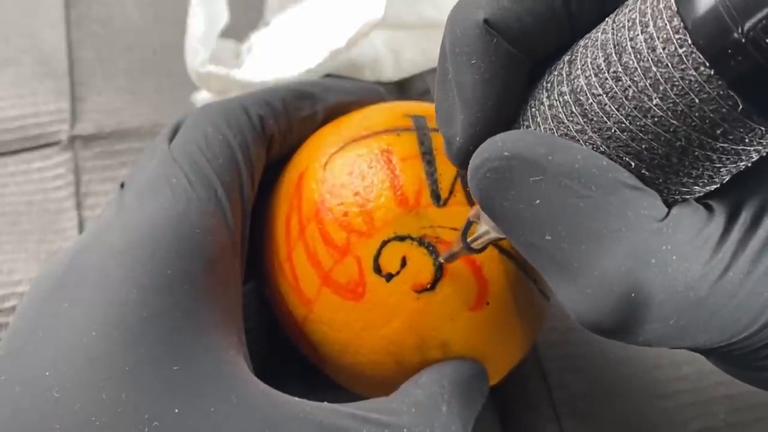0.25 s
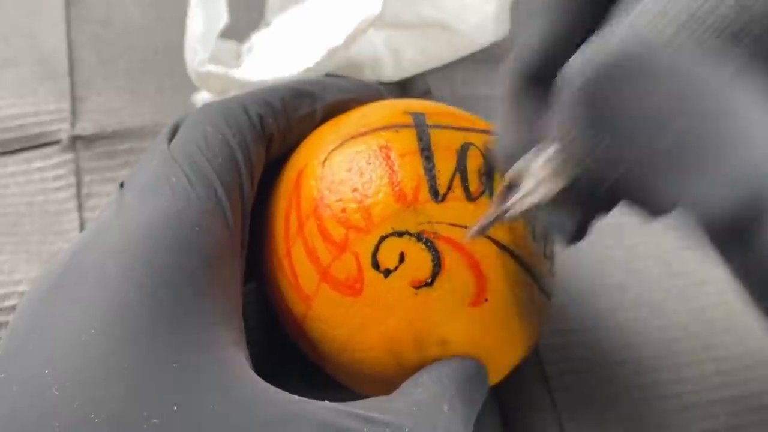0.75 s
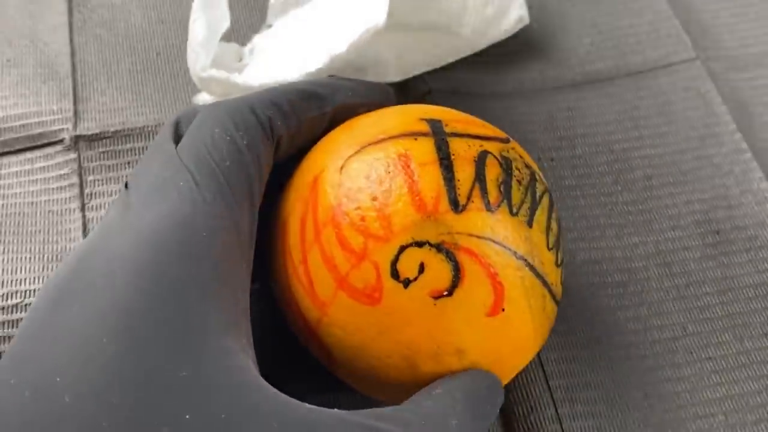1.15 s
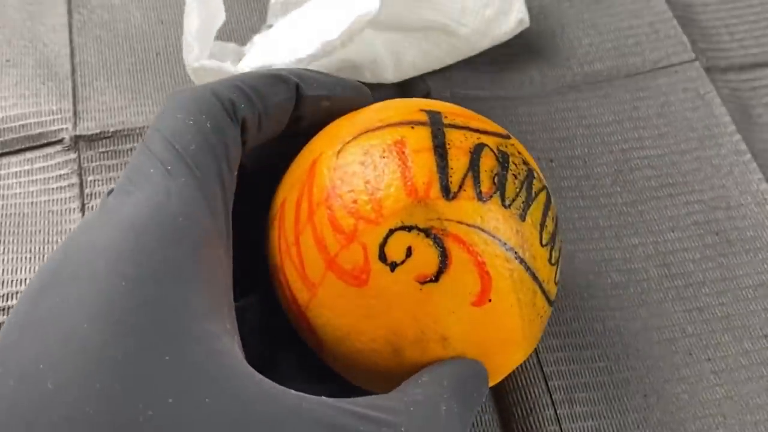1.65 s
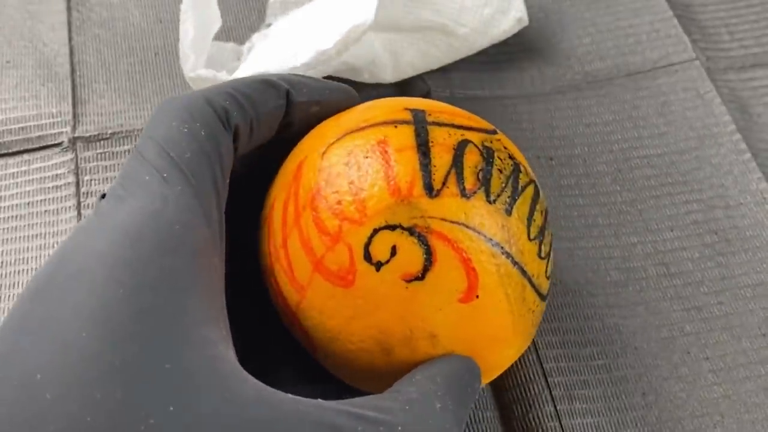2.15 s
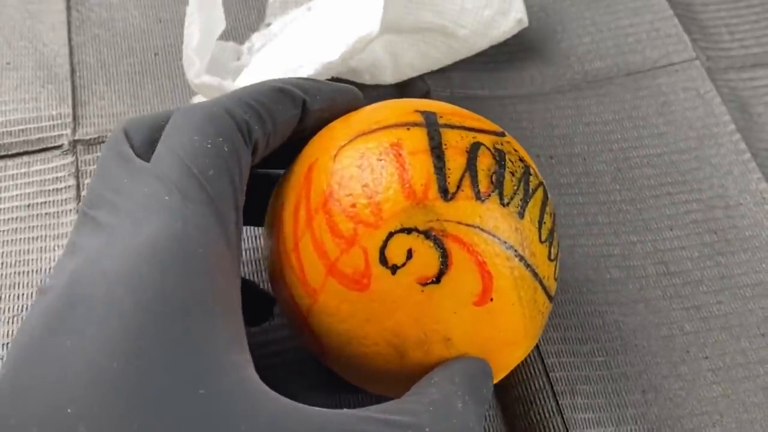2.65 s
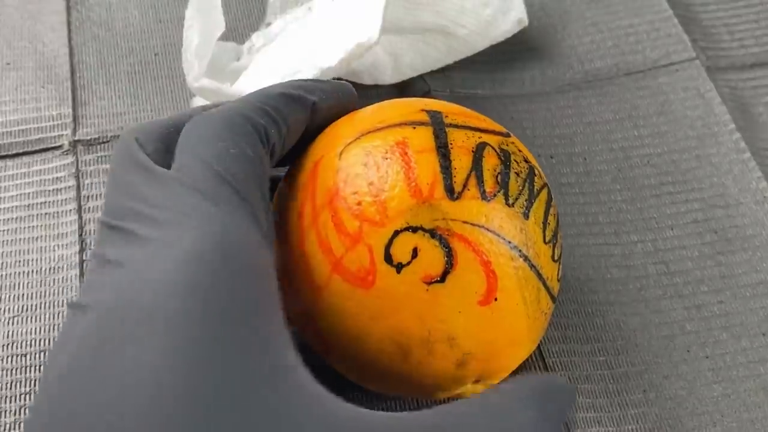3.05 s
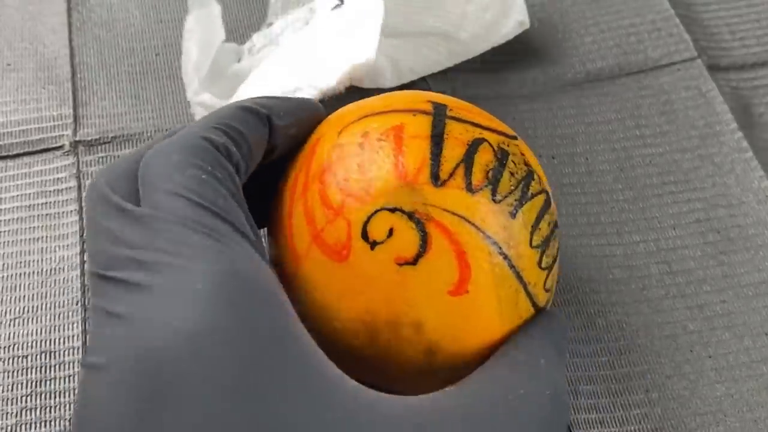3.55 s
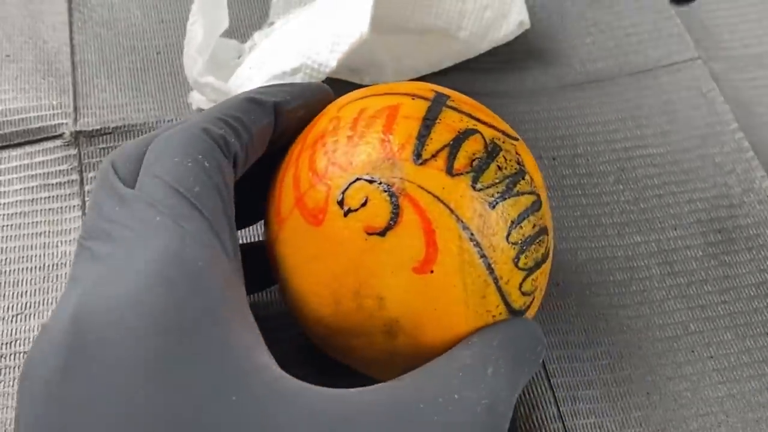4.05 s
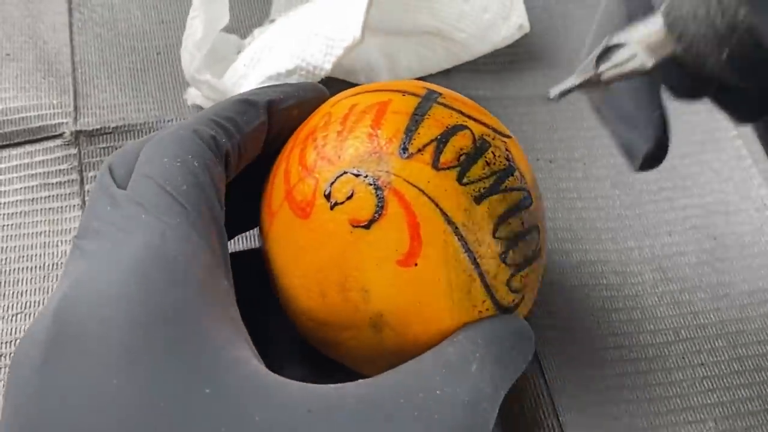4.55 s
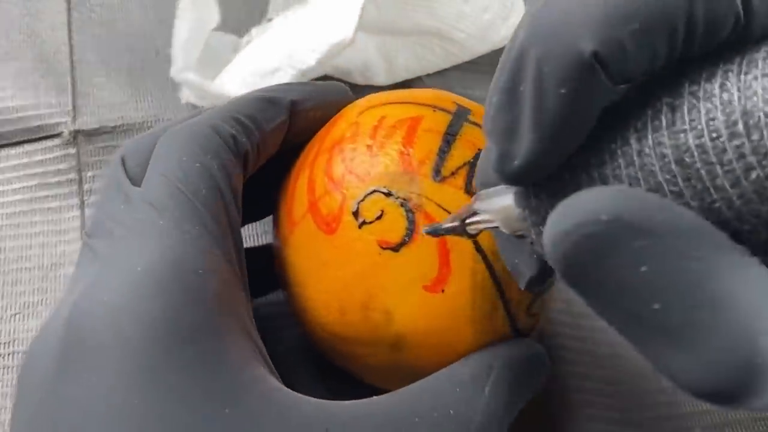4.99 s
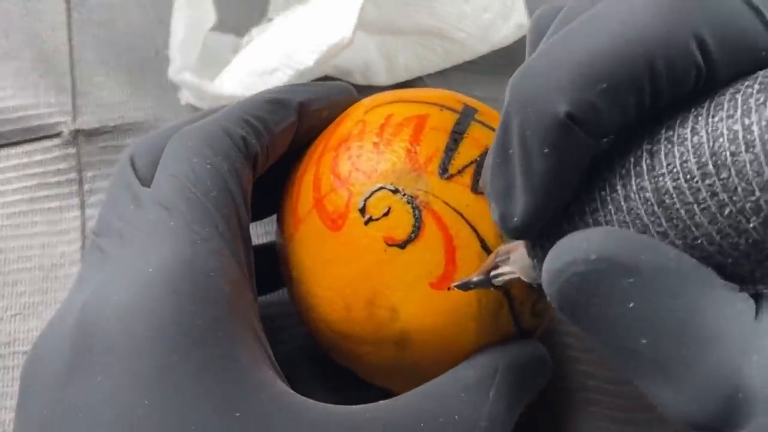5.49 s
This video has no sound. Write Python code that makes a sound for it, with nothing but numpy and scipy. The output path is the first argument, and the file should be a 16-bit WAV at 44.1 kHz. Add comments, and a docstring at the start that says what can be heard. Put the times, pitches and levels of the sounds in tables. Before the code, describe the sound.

Close, steady whirr and rapid ticking of a small needle motor, with a brief deep bump and soft rubber glove rustles in a quiet room.

```python
"""A rotary tattoo pen ticks and whirrs at a steady speed close by, while the orange it works on hums.
Its drive knocks at three points of each turn; the motor, housing and bearing add whirr, whine and rasp.
The pen is lifted off and held aside, where its bearing rasps louder, and then comes back turned to the left.
A low handling rumble with thumps passes over the microphone; gloves rustle and tap in a quiet room.
Ticks are short bursts, the whirr and rubs are shaped noise, and the whine and hums are sine waves."""
import sys
import numpy as np
from scipy import signal
from scipy.fft import rfft, irfft, next_fast_len
from scipy.io import wavfile
from scipy.ndimage import map_coordinates

SR = 44100
rng = np.random.default_rng(int(sys.argv[2]) if len(sys.argv) > 2 else 0)


def master(y):
    """Save y as 16-bit WAV."""
    cut = np.clip(np.atleast_2d(y).T, -1, 1)
    pcm = np.round(cut * 32767)  # scale
    wavfile.write(sys.argv[1], SR, pcm.astype(np.int16))


N = 252428

TURN_HZ = 80.4  # turns of the motor a second
CAGE_CYCLE_S = 0.286  # one cycle of the cage that holds the bearing's balls
REGRIP_S = 0.36  # time the hand takes to change its hold

# When the pen is held aside: start in seconds, end in seconds.
ASIDE = (1.41, 3.43)
# When the pen is back and turned to the left: start in seconds, end in seconds.
TURNED = (4.66, 6)
# When the arm reaches back in: start in seconds, end in seconds.
REACH = (4.2, 4.58)


def pen(turns, left_db=2.0, aside_left_db=-1.8, turned_left_db=3.5):
    """Motor whirr, whine, bearing and drive; the left-right balance shifts as the hand turns the pen."""
    # Whirr of the housing. Each row: frequency in Hz, relative level in dB per Hz.
    housing_shape = [(200, -8.5), (450, -14), (660, -20), (810, -5.5), (1000, -6), (1100, -7.5),
                     (1260, -1.5), (1550, -0.5), (1800, 2.5), (2150, -1), (2600, -3.5), (4000, -43)]
    # Dull lower part of the whirr. Each row: frequency in Hz, relative level in dB per Hz.
    low_whirr_shape = [(200, -9), (400, -3), (700, -7), (1100, -36), (3000, -70)]
    # Whirr of brushes and housing. Each row: frequency in Hz, relative level in dB per Hz.
    brush_shape = [(700, -45), (1500, -20), (2200, -2), (2600, -1), (3000, -0.5), (3400, -7), (4200, -2.5),
                   (5500, -15), (9000, -64)]
    # Hiss of the brushes. Each row: frequency in Hz, relative level in dB per Hz.
    hiss_shape = [(700, -25), (2500, -39), (4200, 0.5), (5500, 6), (6500, 8), (7600, 6.5), (8900, 8),
                  (10400, 6.5), (11500, 7), (13000, 4), (15000, 2), (15800, -9)]
    tonal = .65  # share of the whirr's power that is tones, the rest is noise
    housing = coloured(rasp(turns, tonal, side_db=-3.0), housing_shape)
    housing *= pose(-55.5, follows=0.8, aside_db=0.5, turned_db=-1.5)
    # weaker while the pen is held aside
    low_whirr = coloured(rasp(turns, tonal, side_db=1.0), low_whirr_shape)
    low_whirr *= pose(-67.0, follows=2.4, aside_db=-7.0, turned_db=-4.5)
    brushes = coloured(rasp(turns, tonal, side_db=-25), brush_shape)
    brushes *= pose(-58.0, follows=0.81, aside_db=-2.0, turned_db=1.0)
    hiss = coloured(spread(chatter(turns, repeat=0.14), side_db=0.5), hiss_shape)
    hiss *= pose(-55.5, follows=1.46, aside_db=-0.6, turned_db=-0.5)
    shake = amp(-62) * tones(turns, [(1, 0)], waver_db=3, skew=.05)  # the rotor's imbalance
    lean = pose(left_db, follows=0.19, aside_db=aside_left_db, turned_db=turned_left_db)
    sides = lean ** np.array([[.5], [-.5]])
    # each group of parts leans to the side by its own amount
    whirr = (flare(turns, tonal) + housing + bearing(turns) + low_whirr + brushes) * sides ** 0.77
    singing = (gears(turns) + whine(turns)) * sides ** 2.5
    crisp = (drive(turns) + hiss) * sides ** 0.22
    return hollowed(whirr + singing + crisp) + shake


def drive(turns, tremble_db=1.74):
    """The needle bar knocks at its stroke end, on the way back and at the top; the first two ring its tube."""
    # Stroke-end tick. Each row: frequency in Hz, relative level in dB per Hz.
    end_shape = [(500, -40), (1000, -2), (1600, -5.5), (2900, 3.5), (3400, -1.5), (4200, -8), (5300, -3),
                 (6200, -2.5), (7400, -0.5), (8200, -5.5), (8900, 5), (10400, -7), (11300, 1.5),
                 (12200, -3.5), (13000, -4), (15500, -6)]
    # Tick on the way back. Each row: frequency in Hz, relative level in dB per Hz.
    return_shape = [(500, -30), (1100, -40), (2600, -11), (4800, 11), (6800, -12), (9000, -11),
                    (10400, -11), (11200, 18), (12200, 13), (13000, 12), (15000, -6), (15800, -10)]
    # Tick at the top. Each row: frequency in Hz, relative level in dB per Hz.
    top_shape = [(500, -38), (1000, -16), (1600, 9.5), (2800, -11), (5600, 1.5), (6600, -16), (9000, -14),
                 (10400, -4.5), (11300, 9.5), (12200, 4.5), (13000, 1), (15500, -4)]
    # Base level shared by the return and top ticks. Each row: time in seconds, level in dB.
    treble_levels = [(0, -67), (.55, -69), (.75, -56), (1.47, -56.5), (1.65, -62), (2.6, -60), (2.9, -57.5),
                     (3.6, -57), (4.42, -55.5), (4.78, -66), (5.13, -52), (5.5, -64)]
    # Extra tube ring in some holds. Each row: start in seconds, end in seconds, added level in dB.
    tube_swells = [(-.2, .55, -68.5), (0.582, .85, -63.5), (1.382, 1.552, -67.5), (1.945, 2.8, -64),
                   (3.423, 3.6, -66), (4.253, 4.76, -64.5)]
    treble_db, = curves(treble_levels)
    ring = amp(-71.5)  # the tube's ring outside these swells
    for start, stop, db in tube_swells:
        ring = ring + amp(db) * held(start, stop, fade=0.22)
    end = ticks(turns, at=.17, decay=0.0013, spectrum=end_shape, side_db=-8.0, contact_db=-11.0)
    end *= pose(-54.5, follows=1.35, aside_db=-1.5, turned_db=0.0)
    first_ring = tube(turns, at=.22, side_db=-18, contact_db=7)
    second_ring = amp(-7.5) * tube(turns, at=.6, side_db=-23, contact_db=9)
    rung = ring * (first_ring + second_ring)
    back = ticks(turns, at=.57, decay=0.00094, spectrum=return_shape, side_db=0.5, contact_db=-7.5)
    back *= pose(-3.0, follows=-.1, aside_db=0.5, turned_db=-2.5)
    top = ticks(turns, at=0.97, decay=0.00087, spectrum=top_shape, side_db=-1, contact_db=-9)
    top *= pose(-0.34, follows=-0.18, aside_db=-3.0, turned_db=-9)
    load = amp(1.1 * wobble(14))  # the rattle waxes and wanes a little
    return end * amp(tremble_db * wobble(25.01)) + (rung + (back + top) * amp(treble_db)) * load


def ticks(turns, at, decay, spectrum, side_db, contact_db):
    """One sharp contact near the same point of each turn, with a rattle that dies in decay seconds."""
    play = .0055 * wobble(2 * TURN_HZ)  # in turns: loose parts meet a little early or late
    position = turns + play - at + 2
    lap, part = np.divmod(position, 1)
    size_db = .7 * rng.standard_normal(int(6 * TURN_HZ) + 9)  # one strength for each turn
    size = amp(size_db)[lap.astype(int)]
    contact = unit(np.diff(lap, prepend=lap[0])) * [[1], [0]]  # in the middle only
    rattle = unit(chatter(position, repeat=.6) * np.exp(-part / TURN_HZ / decay))
    return ringing(spread(rattle + amp(contact_db) * contact, side_db) * size, spectrum)


def tube(turns, at, side_db, contact_db):
    """One knock a turn with a ringing band near 4 kHz, which slides up and down over the seconds."""
    # Ringing band. Each row: frequency in Hz, relative level in dB per Hz.
    tube_shape = [(800, -54), (2500, -10.5), (3300, -8.5), (3700, 3), (4000, 6), (4350, 2), (4800, -6),
                  (5400, -13), (8000, -24.5)]
    # Where the band slides to. Each row: time in seconds, pitch in Hz.
    tube_pitch = [(0, 4230), (.7, 4230), (.9, 4050), (1.5, 4300), (1.95, 3920), (2.55, 4150), (2.95, 3750),
                  (3.45, 4330), (3.7, 4680), (4.25, 4350), (4.62, 3730), (5.7, 4000)]
    pitch_hz, = curves(tube_pitch)
    knocks = ticks(turns, at, decay=0.00053, spectrum=tube_shape, side_db=side_db, contact_db=contact_db)
    age = ((turns - at + .1) % 1 - .1) / TURN_HZ  # seconds since the knock
    shift = np.exp(2j * np.pi * (pitch_hz - 4000) * age)  # moves the ring away from its 4000 Hz centre
    return np.real(signal.hilbert(knocks, next_fast_len(N))[:, :N] * shift)


def bearing(turns):
    """A narrow rasp pulses with the shaft; held aside, the ball cage catches in a limping rhythm."""
    # Three catches in each cage cycle. Each row: seconds into the cycle, peak in dB, half length in seconds.
    catches = [(0, -52, 0.0086), (0.109, -55.5, 0.0063), (.16, -56.5, .016)]
    band = [(1200, -90), (1700, -80), (1810, 5), (1920, 8.5), (2010, 8.5), (2080, -34), (2600, -87)]
    first_s = 1.606  # a cage cycle starts here
    cage = 0
    for s, db, length in catches:
        cycles = (clock() - first_s - s) / CAGE_CYCLE_S
        from_catch = (cycles + .5) % 1 * CAGE_CYCLE_S - CAGE_CYCLE_S / 2  # seconds to the nearest catch
        cage = cage + amp(db) * np.exp(-(from_catch / length) ** 2)
    pulse = 1 + 0.37 * np.cos(2 * np.pi * (turns - .25))
    level = pose(-62.5, follows=0.27, aside_db=3.5, turned_db=-0.5) + cage * held(*ASIDE, REGRIP_S)
    return level * pulse * even(band, side_db=-30.0)


def gears(turns):
    """Motor tones at fixed multiples of the turn rate, each changing with the hold of the pen."""
    # Each row: multiple of the turn rate, level in dB before the nearness acts, change when held aside
    # in dB before a common cut, change when turned in dB.
    motor_orders = [(9, -79, -6, -8), (10, -76, 5, -4), (11, -79, 7, -7), (12, -77, 6, -2),
                    (15, -81, 7, -6), (16, -71.5, 5, -1), (17.25, -73, -4, -7), (18.52, -64.5, -6, -13),
                    (19.3, -65.5, -6, -11), (20.5, -73, -3, -4), (21.23, -76, 3, 3), (22.8, -71, 0, -5),
                    (24, -66.5, -1, -4), (27, -74, 0, 5), (32, -66.5, -5, 0), (36, -64.5, -7, -5),
                    (37, -77, -3, 2), (40, -80, -3, -1), (48, -76, -2, 0), (49, -76, -2, -4),
                    (51, -75.5, 0, -6), (54, -77, -2, -4), (56, -75, -3, -2)]
    out = 0
    for order, db, aside, turned in motor_orders:
        level = pose(db, follows=2.17, aside_db=aside - 3.5, turned_db=turned)  # 3.5 dB is the common cut
        out = out + level * tones(turns, [(order, 0)], waver_db=2.5, skew=0.57)
    return out


def whine(turns):
    """The motor sings on two high multiples of the turn rate, which stand out in some holds."""
    # Each row: multiple of the turn rate, relative level in dB.
    whine_orders = [(28, -2), (29, -15)]
    # Each row: start in seconds, end in seconds, added level in dB, rise and fall in seconds.
    whine_swells = [(0.755, 0.966, -58.5, 0.07), (1.44, 3.543, -57, 0.29), (4.16, 4.395, -58, 0.17),
                    (4.7, 6, -65.5, 0.2)]
    sing = amp(-70.5)  # level outside the swells
    for start, end, db, fade in whine_swells:
        sing = sing + amp(db) * held(start, end, fade)
    return sing * tones(turns, whine_orders, waver_db=0.8, skew=0.39)


def flare(turns, tonal):
    """The housing rings out as the pen leaves the fruit."""
    # Start in seconds, end in seconds.
    flare_span = (.77, 0.94)
    # Each row: frequency in Hz, relative level in dB per Hz.
    flare_shape = [(1100, -25), (1520, 8), (1680, -2), (1850, 5), (2200, 1), (2550, -14), (2900, -3),
                   (3500, -18), (4500, -10), (6000, -12), (8000, -30)]
    return amp(-55) * held(*flare_span, fade=0.068) * coloured(rasp(turns, tonal, side_db=-11), flare_shape)


def hollowed(x):
    """The whirr sounds hollow, with one band turned down, while the pen is tipped back in."""
    # Start in seconds, end in seconds.
    hollow_span = (4.35, 4.68)
    centre_hz, width_hz, band_db = 2440, 210, -8
    band = filtered(x, lambda hz: np.exp(-((hz - centre_hz) / width_hz) ** 2))
    return x - (1 - amp(band_db)) * held(*hollow_span, fade=.16) * band


def pose(db, follows, aside_db, turned_db):
    """Gain of one part of the pen: it follows the nearness and changes with the hold."""
    # How near the hand holds the pen. Each row: time in seconds, gain in dB where follows is 1.
    nearness = [(0, -0.5), (.36, .3), (.62, -0.8), (.77, -0.9), (.95, -1.5), (1.15, -3.5), (1.32, -2.7),
                (1.62, -2), (2.5, -2.5), (3.28, -3.5), (3.72, -3), (4.33, -1.35), (4.58, -1.3),
                (4.85, -0.5), (5.72, -0.5)]
    near_db, = curves(nearness)
    hold_db = aside_db * held(*ASIDE, REGRIP_S) + turned_db * held(*TURNED, REGRIP_S)
    return amp(db + follows * near_db + hold_db)


def bright_bursts():
    """Two very short bright bursts of noise, each starting sharply and fading at once."""
    # Each row: time in seconds, peak in dB.
    burst_list = [(0.721, -40), (2.279, -44)]
    t60_s = 0.013  # time to fall by 60 dB
    t = clock()
    level = sum(amp(db - 60 * np.abs(t - s) / t60_s) * (t >= s) for s, db in burst_list)
    return level * noise([(1500, -23), (4000, -2), (12000, 15), (15500, -8)], side_db=-10)


def orange(turns, stab=0.926, lag=0.254, overtone_db=-4):
    """Each stab pushes the peel in; the fruit answers later in higher overtones that outlast the pressure."""
    # Needle pressed on the orange. Each row: start in seconds, end in seconds, base level in dB.
    presses = [(0, 0.064, -40), (.215, .37, -41.5), (0.4, 0.42, -38.5)]
    # Overtones of the peel. Each row: multiple of the turn rate, relative level in dB.
    peel_orders = [(2, 2.5), (3, -6.5), (4, -3.5), (5, -13), (6, -16.5), (7, -19), (9, -22.5), (10, -30)]
    lift_off_s = 0.594  # the needle leaves the peel
    hum = np.max([amp(db) * swell(start, end, rise_db_per_s=214, fall_db_per_s=225)
                  for start, end, db in presses], axis=0)
    touch = np.max([amp(db) * swell(start, end, rise_db_per_s=136, fall_db_per_s=116)
                    for start, end, db in presses], axis=0)
    angle = 2 * np.pi * (turns - stab)
    buzz = 0
    for order, db in peel_orders:
        wave = np.cos(order * angle - lag * (order - 2) ** 2)
        buzz = buzz + amp(db + 2.0 * wobble(11.0)) * wave
    push = hum * np.sqrt(2) * np.cos(angle) + amp(overtone_db) * touch * unit(buzz)
    return -push * held(-1, lift_off_s, fade=0.08) * amp([[.5], [-.5]])


def handling(rumble_db=-34, body_db=-35.0, rub_db=-41, scrape_db=-49.0):
    """A lumpy rumble swells at the microphone, peaks, scrapes and flutters out; a soft bump follows later."""
    # Deep rumble. Each row: frequency in Hz, relative level in dB per Hz.
    rumble_shape = [(18, -62), (26, -17), (33, -20), (43, 0.5), (60, -2.5), (90, -9), (130, -25),
                    (220, -47), (800, -110)]
    # Fuller part of the rumble. Each row: frequency in Hz, relative level in dB per Hz.
    body_shape = [(30, -40), (70, -35), (140, 3.5), (260, 2), (350, -3), (450, -15), (700, -35),
                  (3000, -80)]
    # Rubbing above the rumble. Each row: frequency in Hz, relative level in dB per Hz.
    rub_shape = [(150, -29.5), (300, -6), (440, 0), (650, -6), (870, -8), (1100, -20.5), (2000, -47),
                 (6000, -80)]
    # Scrape after the peak. Each row: frequency in Hz, relative level in dB per Hz.
    scrape_shape = [(250, -20), (650, -0.5), (880, -9), (1120, 1), (1350, -9), (1600, -4), (2100, -4),
                    (3000, -16), (6000, -35)]
    # Soft thumps. Each row: time in seconds, peak in dB before the balance, pitch in Hz,
    # half length in seconds.
    thumps = [(1.651, -33, 54, .016), (1.726, -24, 66, 0.013), (1.917, -33, 49, 0.021),
              (1.994, -33, 49, 0.016), (2.074, -35, 54, 0.021), (4.384, -42.5, 127, 0.025)]
    start_s, peak_s, stop_s = 1.585, 1.723, 2.115
    lumps = amp(1.1 * wobble(90))  # the contact catches and slips
    rumble = amp(rumble_db) * swell(peak_s, peak_s, rise_db_per_s=20, fall_db_per_s=41)
    rumble = rumble * even(rumble_shape, side_db=-19)
    body = amp(body_db) * swell(peak_s, peak_s, rise_db_per_s=73, fall_db_per_s=59.5)
    body = body * even(body_shape, side_db=-14)
    rub = amp(rub_db) * swell(peak_s, peak_s, rise_db_per_s=98, fall_db_per_s=77)
    rub = rub * even(rub_shape, side_db=0.5)
    scrape = amp(scrape_db) * swell(1.76, 1.786, rise_db_per_s=600, fall_db_per_s=106)
    scrape = scrape * noise(scrape_shape, side_db=-1)
    out = (rumble + (body + rub + scrape) * lumps) * held(start_s, stop_s, fade=0.08)
    for s, db, hz, length in thumps:
        age = clock() - s
        out += amp(db) * np.exp(-(age / length) ** 2) * np.cos(2 * np.pi * hz * age)
    scuff = amp(-51.5) * swell(2.012, 2.032, rise_db_per_s=1200, fall_db_per_s=450)
    scuff = scuff * noise(tilted(rub_shape, -11), side_db=-9.0)
    return (out + scuff) * amp([[.4], [-.4]])


def gloves():
    """Rubber slides in soft swells and taps the fruit."""
    # Slides. Each row: time in seconds, peak in dB before the slipping, half length in seconds.
    rustles = [(0.66, -58, 0.071), (0.886, -61.5, 0.13), (1.298, -55, 0.086), (3.3, -67.5, .08),
               (3.46, -63.5, .035), (3.816, -61.5, 0.11), (4.22, -59.5, .2)]
    # Sliding rubber. Each row: frequency in Hz, relative level in dB per Hz.
    glove_shape = [(200, 2), (650, 7.5), (1100, 13.5), (1550, 13), (2700, 6), (3600, 3), (5500, 6),
                   (8000, 6), (15000, -24)]
    # Taps. Each row: time in seconds, peak in dB, time to fall by 60 dB in seconds,
    # brightness in dB per octave.
    tap_list = [(3.171, -51, 0.027, 3.5), (3.424, -43, 0.075, 1), (3.438, -51, 0.065, -1.5),
                (3.474, -50.5, 0.045, -2)]
    # A tap before its brightness. Each row: frequency in Hz, relative level in dB per Hz.
    tap_shape = [(200, -10), (450, -1), (700, 4), (1050, 9), (1500, 1), (2400, 0), (3150, 3.5), (4000, -8),
                 (9000, -11), (15000, -22)]
    t = clock()
    slide = sum(amp(db) * np.exp(-((t - s) / length) ** 2) for s, db, length in rustles)
    taps = 0
    for s, db, t60, bright in tap_list:
        decay = amp(db - 60 * np.abs(t - s) / t60) * (t >= s)
        taps = taps + decay * noise(tilted(tap_shape, bright), side_db=-2.5)
    slip = amp(1.8 * wobble(60))  # rubber sticks and slips
    return slide * slip * noise(glove_shape, side_db=-14) + taps


def low_noise(level_db=-61):
    """Soft low noise around 135 Hz that fades in at 4.2 s and stays."""
    # Each row: frequency in Hz, relative level in dB per Hz.
    low_noise_shape = [(60, -30), (100, -3), (135, 0), (175, -5), (240, -20), (500, -45), (2000, -90)]
    level = amp(level_db + 2 * wobble(6)) * held(REACH[0], TURNED[1], fade=.2)
    return level * noise(low_noise_shape, side_db=-12)


def room_tone(rumble_db=-53, reach_db=2.5):
    """Low rumble, a little stronger while the hand is near or reaching in, and one faint hum."""
    # Rumble of the room. Each row: frequency in Hz, relative level in dB per Hz.
    air_shape = [(22, -62), (38, -7), (55, 6), (80, -2), (120, -4), (170, -11.5), (260, -17.5), (380, -36),
                 (600, -37), (2000, -52), (15000, -81)]
    # Hum of steady pitch. Each row: frequency in Hz, level in dB around which it wavers.
    room_hum = [(282, -69.5)]
    level = pose(rumble_db, follows=0.31, aside_db=0.5, turned_db=1.2)
    level = level * amp(reach_db * held(*REACH, fade=0.39))
    hum = sum(np.sqrt(2) * amp(db + wobble(4.41)) * np.sin(2 * np.pi * hz * clock()) for hz, db in room_hum)
    return level * noise(air_shape, side_db=-12.0) * amp([[.4], [-.4]]) + hum


def walls(x):
    """The small room's answer, a tail of fading noise; treble dies first."""
    # Each row: frequency in Hz, time to fall by 60 dB in seconds.
    wall_t60 = [(200, 0.51), (2000, 0.16), (12000, 0.079)]
    hz, t, z = signal.stft(rng.standard_normal((2, SR // 3)), SR, nperseg=256)
    fading = z * amp(-60 * t / along(wall_t60, hz)[:, None])
    tail = signal.istft(fading, SR, nperseg=256)[1]
    return signal.fftconvolve(x, tail / np.linalg.norm(tail[0]), axes=1)[:, :N]


def tones(turns, orders, waver_db, skew):
    """Shaft tones that waver in level and reach left and right a little out of phase."""
    out = np.zeros((2, N))
    for order, db in orders:
        phase = 2 * np.pi * (order * turns + rng.random()) + skew * rng.standard_normal((2, 1))
        out += np.sqrt(2) * amp(db + waver_db * wobble(7)) * np.sin(phase)
    return out


def rasp(turns, tonal, side_db):
    """Shaft harmonics with scattered bearing tones between them, plus noise; tonal is the tones' share."""
    laps = round(CAGE_CYCLE_S * TURN_HZ)  # turns before the pattern repeats
    size = int(laps * SR / TURN_HZ)
    k = np.arange(size // 2 + 1)
    lines = np.where(k % laps == 0, .7, rng.random((2, len(k))) < .12)
    pattern = unit(irfft(lines * np.exp(2j * np.pi * rng.random(lines.shape)), size))
    partials = pattern[:, (turns / laps % 1 * size).astype(int)]
    return spread(np.sqrt(tonal) * partials + np.sqrt(1 - tonal) * rng.standard_normal((2, N)), side_db)


def chatter(turns, repeat):
    """Two noises, each with a share that comes back alike on every turn."""
    size = int(SR / TURN_HZ)
    pattern = rng.standard_normal((2, size))[:, (turns % 1 * size).astype(int)]
    share = np.clip(repeat, 0, 1)
    return np.sqrt(share) * pattern + np.sqrt(1 - share) * rng.standard_normal((2, N))


def ringing(x, spectrum):
    """x through a body that rings only after it is struck, with this (Hz, dB) spectrum, at rms 1."""
    size = 2048
    cepstrum = irfft(np.log(amp(along(spectrum, np.fft.rfftfreq(size, 1 / SR)))))
    # folding the cepstrum forward puts all of the ring after the strike
    cepstrum[1:size // 2] *= 2
    cepstrum[size // 2 + 1:] = 0
    body = irfft(np.exp(rfft(cepstrum)))
    return unit(signal.fftconvolve(x, body[None], axes=1)[:, :N])


def noise(spectrum, side_db):
    """Stereo noise of rms 1."""
    return coloured(spread(rng.standard_normal((2, N)), side_db), spectrum)


def even(spectrum, side_db):
    """Stereo noise of rms 1 whose loudness stays even."""
    pair = coloured(rng.standard_normal((2, N)), spectrum)
    for _ in range(2):
        # keeping only the sign flattens the loudness; half the colour is then put back
        pair = coloured(np.sign(pair), [(hz, db / 2) for hz, db in spectrum])
    return spread(pair, side_db)


def spread(pair, side_db):
    """Two unrelated signals as the middle and the side of a stereo pair."""
    mid, side = pair[0], pair[1] * amp(side_db)
    return unit(np.array([mid + side, mid - side]))


def coloured(x, spectrum):
    """x through a (Hz, dB) spectrum, at rms 1."""
    return unit(filtered(x, lambda hz: amp(along(spectrum, hz))))


def filtered(x, response):
    """x times a response of frequency."""
    m = next_fast_len(N + SR // 2)
    return irfft(rfft(x, m) * response(np.fft.rfftfreq(m, 1 / SR)), m)[..., :N]


def tilted(spectrum, slope):
    """A (Hz, dB) spectrum tilted by slope dB per octave."""
    return [(hz, db + slope * np.log2(hz)) for hz, db in spectrum]


def held(start, end, fade):
    """1 from start to end, with smooth edges fade seconds long."""
    inside = np.minimum(clock() - start, end - clock())
    return .5 + .5 * np.sin(np.pi * np.clip(inside / fade, -.5, .5))


def swell(start, end, rise_db_per_s, fall_db_per_s):
    """Gain that rises until start, holds until end and dies away."""
    t = clock()
    return amp(-rise_db_per_s * np.maximum(start - t, 0) - fall_db_per_s * np.maximum(t - end, 0))


def wobble(rate):
    """A smooth random curve, rate knots a second."""
    knots = rng.standard_normal(int(N * rate / SR) + 4)
    grid = np.arange(len(knots) * 10) / 10
    return np.interp(clock() * rate, grid, map_coordinates(knots, [grid]))


def curves(rows):
    """One value per sample for each column after the time."""
    s, *cols = np.transpose(rows)
    return [np.interp(clock(), s, c) for c in cols]


def along(points, hz):
    """(Hz, value) points joined by straight lines on a log frequency axis."""
    f, v = np.transpose(points)
    return np.interp(np.log(hz + 1), np.log(f + 1), v)


def amp(db):
    """Decibels to a plain gain."""
    return 10 ** (np.asarray(db) / 20)


def unit(x):
    """x scaled to rms 1."""
    return x / np.sqrt(np.mean(x ** 2) + 1e-20)


def clock():
    """Time of each sample in seconds."""
    return np.arange(N) / SR


def scene():
    """The pen, bright bursts and gloves sound in the room; the other layers are added without its echo."""
    turns = np.cumsum(TURN_HZ + .06 * wobble(5)) / SR  # turns made so far, at a nearly steady speed
    near = pen(turns) + bright_bursts() + gloves()
    return near + amp(-12.5) * walls(near) + orange(turns) + handling() + low_noise() + room_tone()


def record(dry, low_cut_hz=27):
    """Treble is folded to mono in bands and turned in phase, left against right; both extremes are cut."""
    # Each row: frequency in Hz, phase of left against right in half turns.
    treble_phase = [(7400, 0), (8600, 1), (9500, 1), (10500, 2), (11600, 2), (12700, 3), (13600, 3),
                    (14800, 4)]
    mono_above_hz, cut_hz = 6300, 15850
    sign = np.array([[1], [-1]])

    def phase(hz):
        return np.pi * along(treble_phase, hz)

    def turned(hz):
        return np.exp(-.5j * sign * phase(hz))

    def side_gain(hz):
        return np.where(hz < mono_above_hz, 1, np.abs(np.sin(phase(hz))))

    mid = filtered((dry[0] + dry[1]) / 2, turned)
    side = filtered((dry[0] - dry[1]) / 2, lambda hz: sign * turned(hz) * side_gain(hz))
    return filtered(mid + side, lambda hz: (hz < cut_hz) / np.sqrt(1 + (low_cut_hz / (hz + 1)) ** 10))


dry = scene()
out = record(dry)
master(out)
```